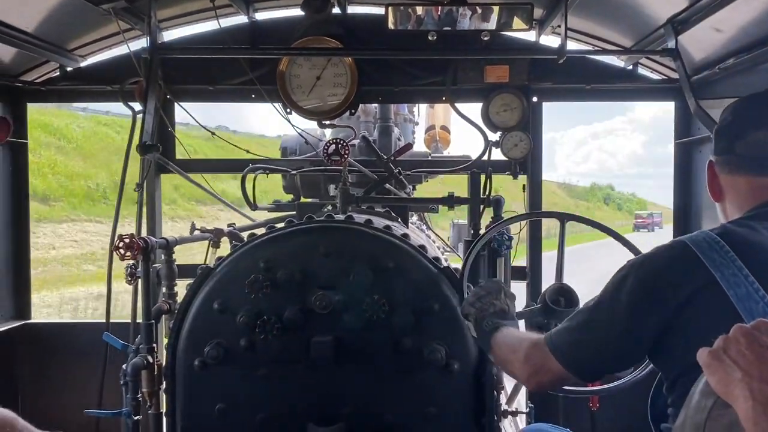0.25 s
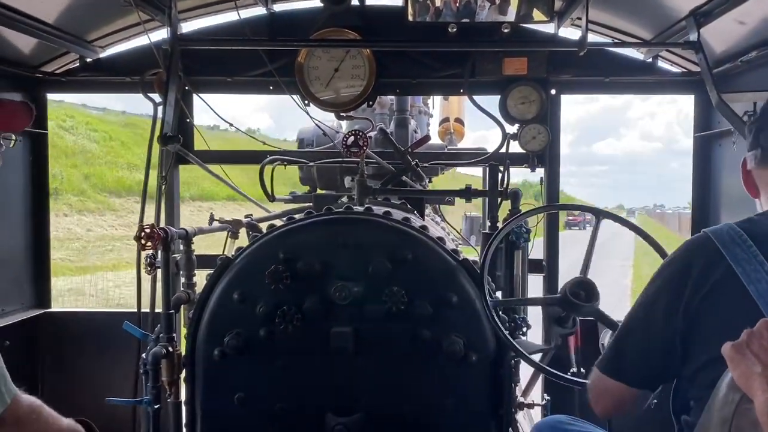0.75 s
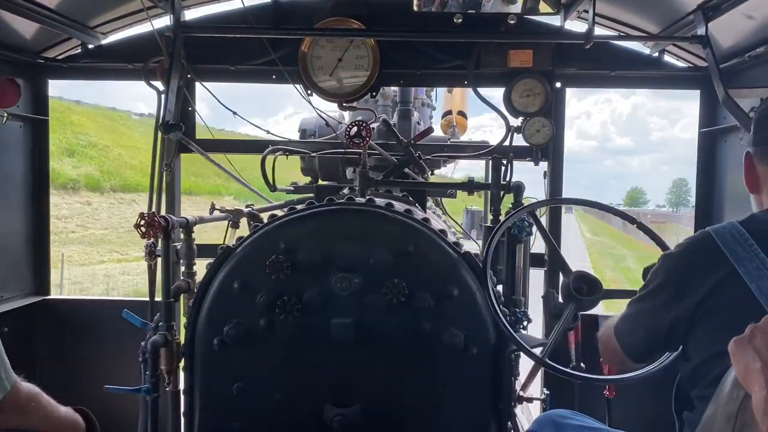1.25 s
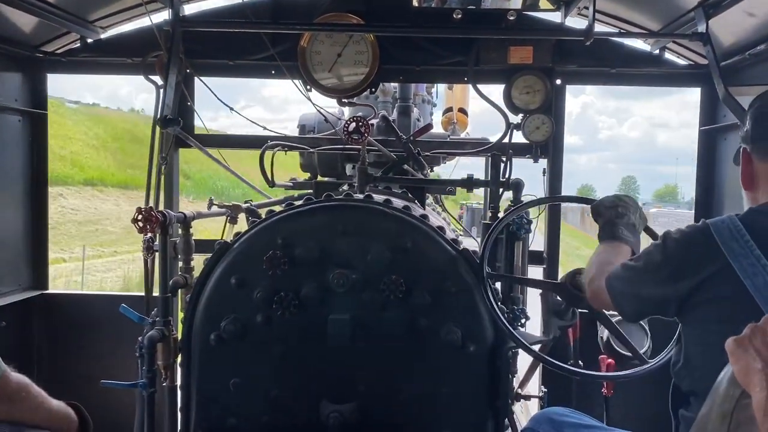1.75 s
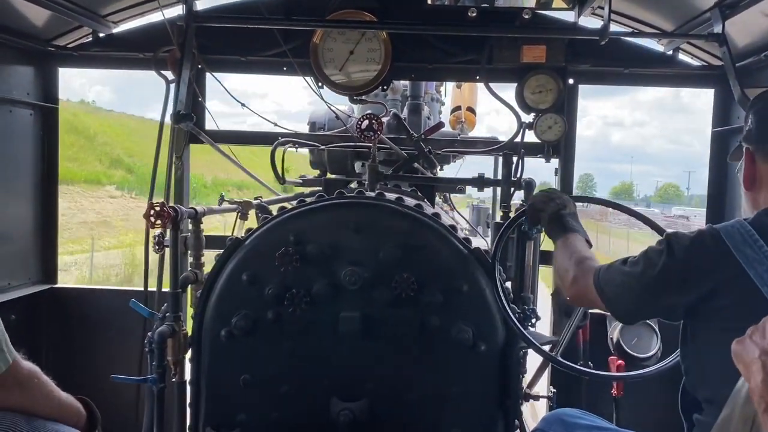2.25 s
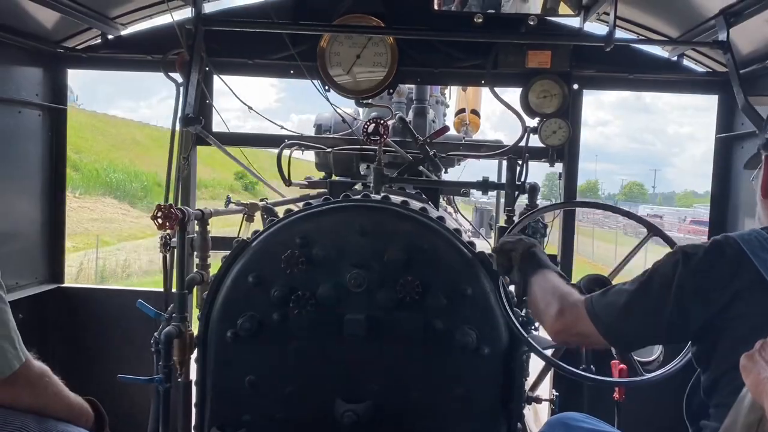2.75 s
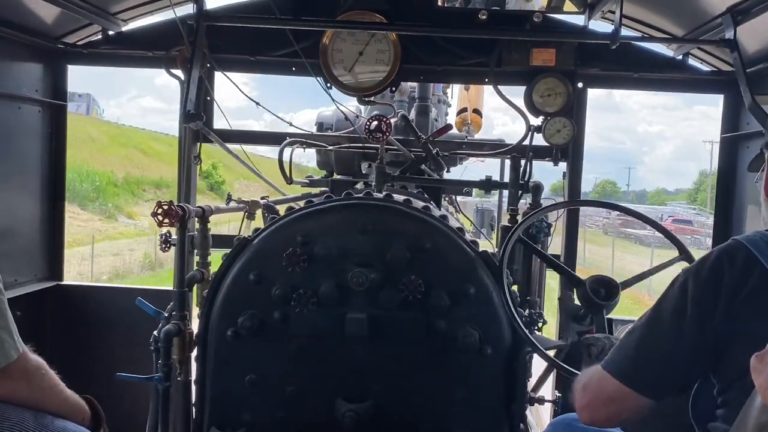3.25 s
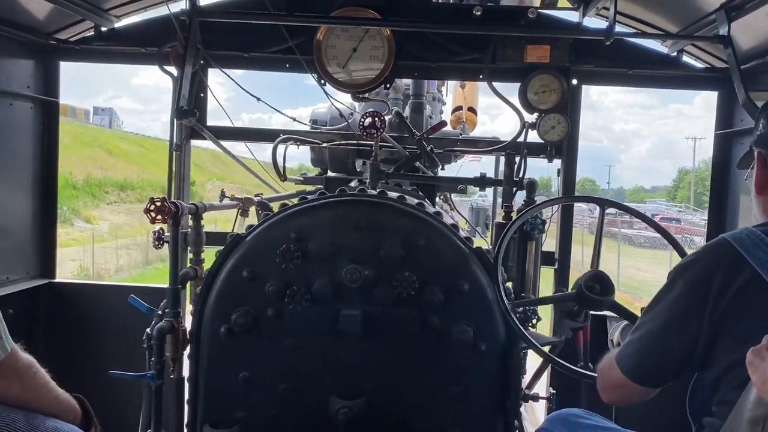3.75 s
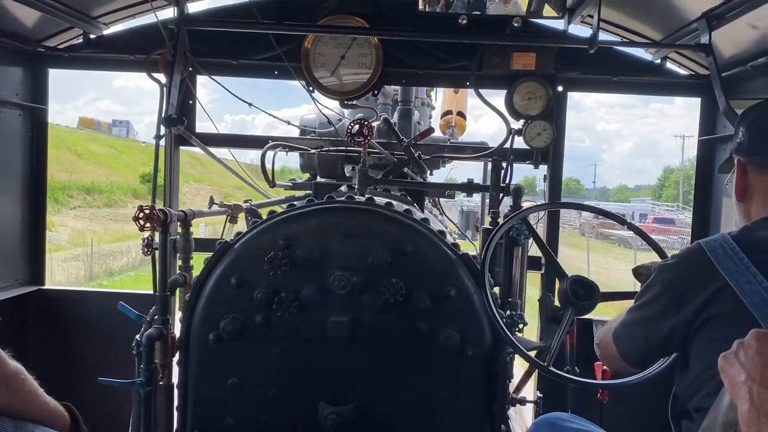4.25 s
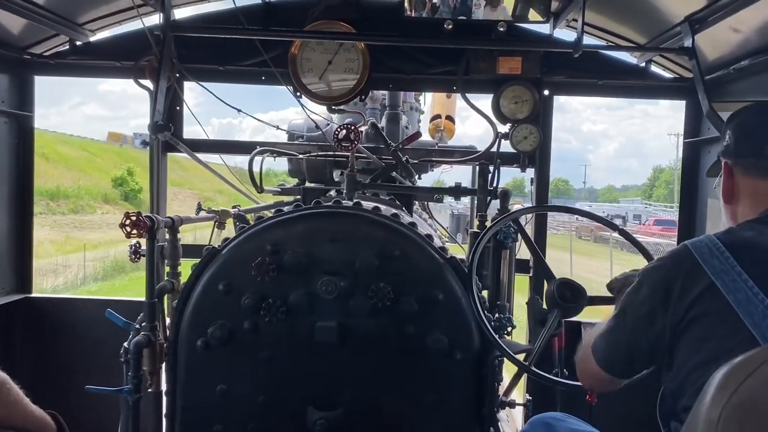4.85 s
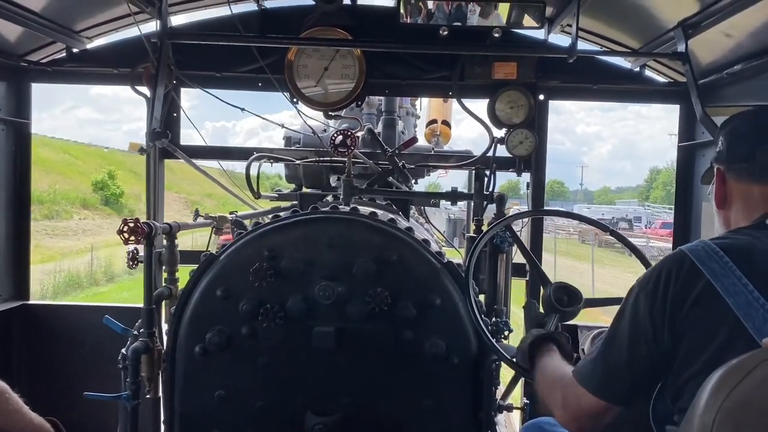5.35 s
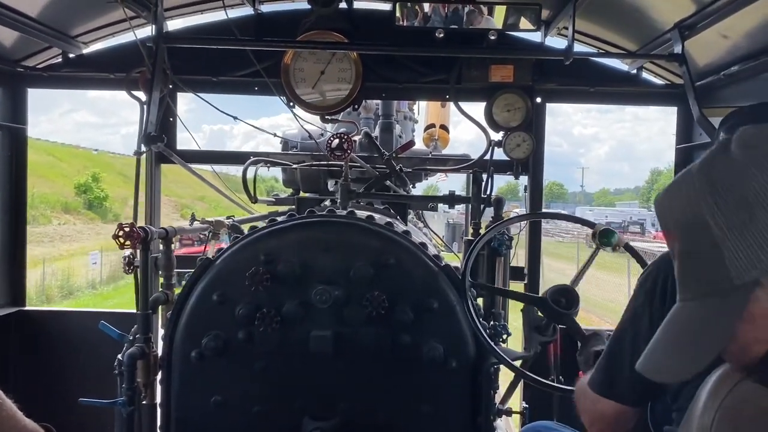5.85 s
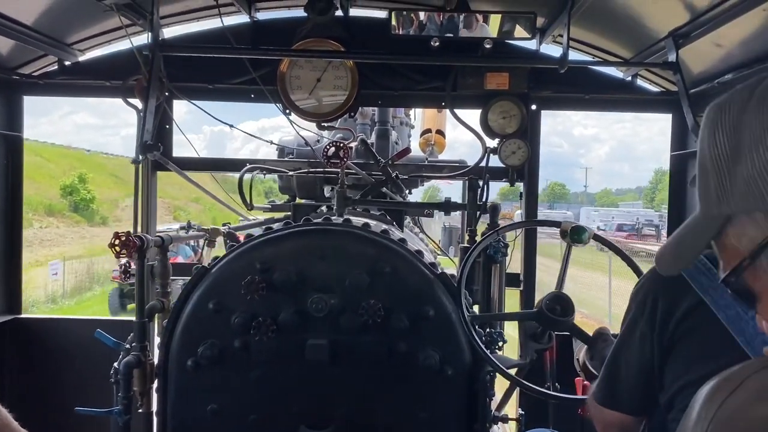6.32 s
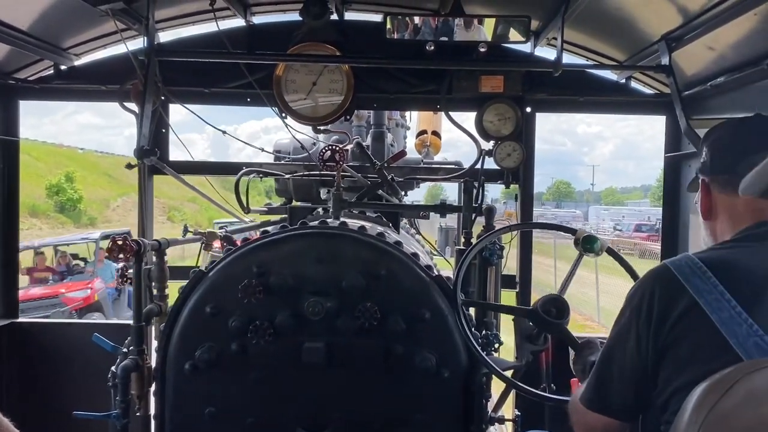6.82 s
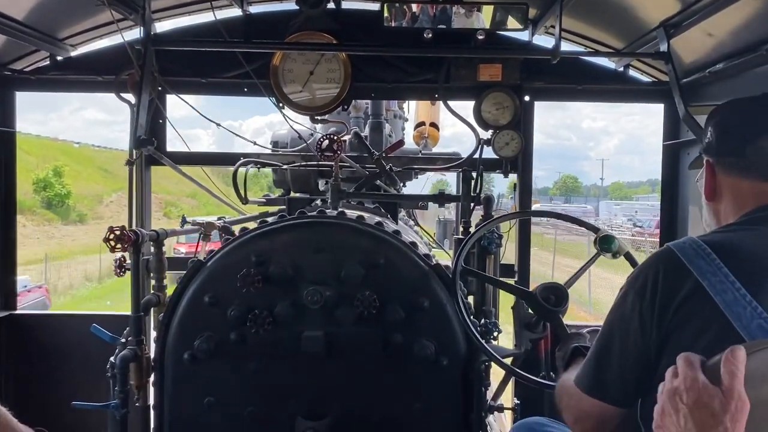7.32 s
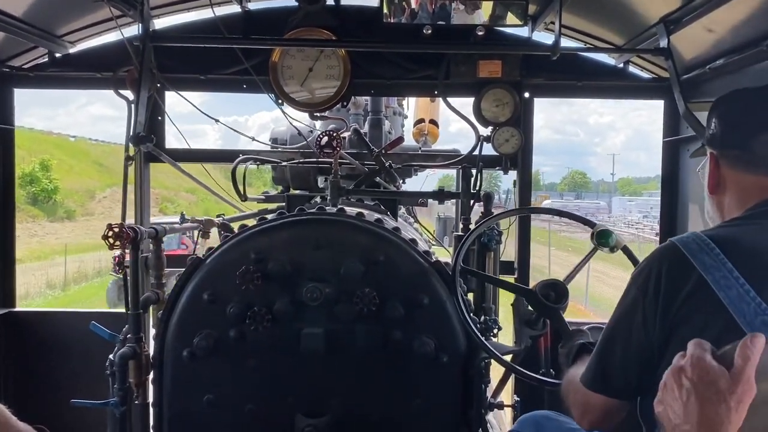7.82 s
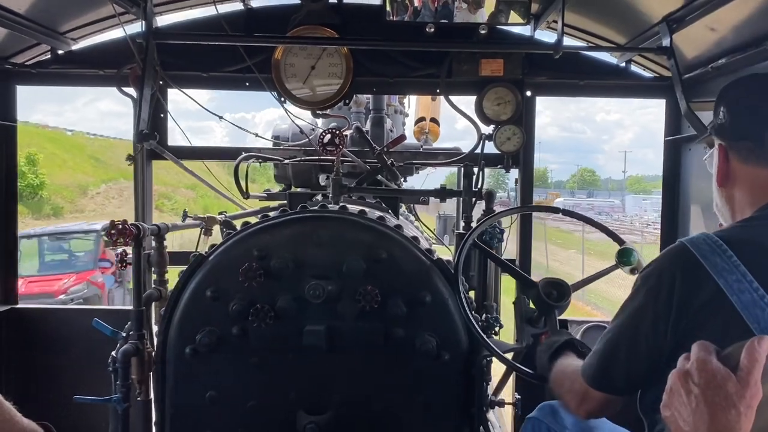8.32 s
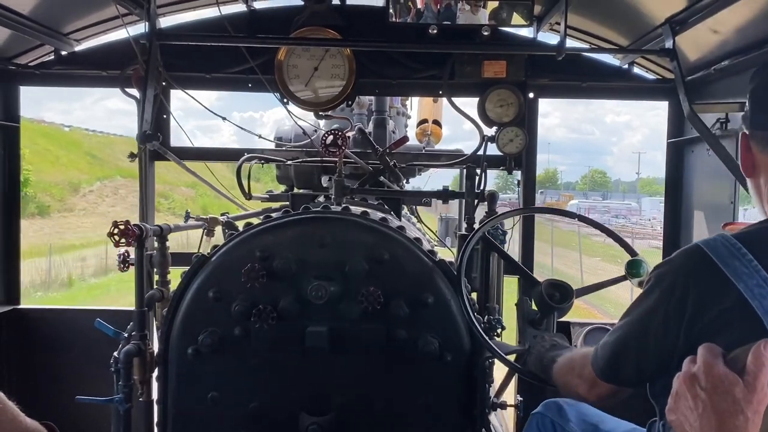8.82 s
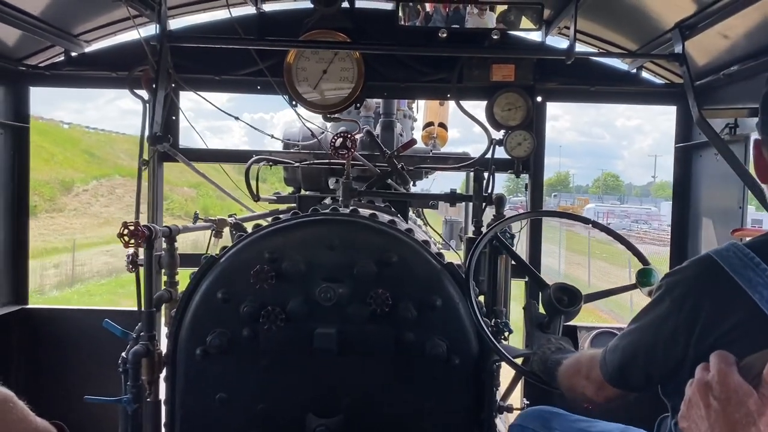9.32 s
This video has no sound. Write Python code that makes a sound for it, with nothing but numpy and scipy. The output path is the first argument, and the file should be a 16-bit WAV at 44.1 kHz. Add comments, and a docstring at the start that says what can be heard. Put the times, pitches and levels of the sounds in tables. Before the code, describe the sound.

A steam engine chugs briskly, hissing, barking puffs over low mechanical rumble and frame thumps, quickening slightly near the end.

```python
"""A two-cylinder steam traction engine rolls along a track, heard from inside its cab.
From the start, filtered noise makes gears and wheels rumble while a little steam leaks.
In each crank turn four exhaust puffs of shaped noise hiss, bark up the chimney and make the cab boom;
twice a turn a heavy knock, led by a softer bump, shakes the frame as a set of fading sine tones.
The crank times all of these, and towards the end it speeds up."""
import sys
import numpy as np
from scipy import signal
from scipy.fft import rfft, irfft, next_fast_len
from scipy.io import wavfile
from scipy.ndimage import uniform_filter1d, minimum_filter1d, map_coordinates

SR = 44100
rng = np.random.default_rng(int(sys.argv[2]) if len(sys.argv) > 2 else 0)


def wav_out(sig):
    """Save sig, one row per channel (or a flat mono array), as 16-bit PCM at SR to the path in sys.argv[1]."""
    wavfile.write(sys.argv[1], SR, np.round(np.clip(np.atleast_2d(sig).T, -1, 1) * 32767).astype(np.int16))


N = 422478  # length in samples

# How fast the crank turns. Each row: time in seconds, speed in crank turns per second.
CRANK_SPEED = [(0, 2.4401), (1.8, 2.4699), (5.6, 2.472), (7.3, 2.5501), (9.58, 2.7302)]
START_TURN = 0.02  # crank angle at the start, in turns
CRUISE_HZ, FAST_HZ = 2.48, 2.57  # crank turns per second at cruising pace and when running fast

# Tone of the gear and wheel rumble. Each row: frequency in Hz, relative level in dB per Hz.
RUMBLE_TONE = [(20, -25.5), (30, -24), (42, -5), (55, -1), (80, -4), (125, -7), (160, -12.5), (250, -8),
               (320, -13.5), (450, -16.5), (600, -23), (1000, -25), (2000, -31.5), (4000, -48.5)]
# Plates and panels that the running gear keeps ringing. Each row: frequency in Hz, width in Hz, lift in dB.
PANEL_RINGS = [(64.2, 4.5, 5.5), (121.4, 7.2, 3), (265, 5.9, 4), (739, 16, 4), (985, 57, 1.5),
               (1365, 28, 5.5)]
# Tone of the steam leaking from the glands. Each row: frequency in Hz, relative level in dB per Hz.
LEAK_TONE = [(1000, -11.5), (2500, 15), (5000, 8), (8000, -19), (16000, -31)]
# Once a turn a piston gland lets out a wisp of steam.
# The one row: crank angle in turns, length in seconds, lift over the steady leak in dB.
GLAND_WISP = (0.71, 0.019, 4.1)

# The drive takes up its slack twice a turn, each knock led by a softer bump.
# Each row: crank angle in turns, level in dB.
KNOCK_ANGLES = [(.578, -8), (.831, -8.5), (.475, -19), (.73, -17.5)]
# Ringing of the frame and cab floor. Each row: frequency in Hz, time to fade by 60 dB in seconds,
# level in dB at the first knock of a turn, level in dB at the second.
FRAME_RINGS = [(42, 0.1, -17, -6), (58.1, 0.29, -2.5, -12), (64.6, 0.47, -13, -1.5), (88.6, 0.1, -4.5, -9),
               (114, 0.14, -29, -9)]
# Slow change in the force of the knocks. Each row: time in seconds, change in dB.
KNOCK_FORCE = [(0, .8), (1.4, -1.5), (2.9, 2), (4, -1.5), (5.2, .7), (6, -1.4), (7.6, 1.3), (8.3, -3),
               (9, -1), (9.5, -3.5)]
KNOCK_SCATTER_DB = 0.8  # random spread from knock to knock

# The four exhaust beats of a turn, the cylinders taking turns; at speed their timing and strength
# shift a little. Each row: crank angle in turns, turns earlier at speed, dB louder at speed,
# then the starting levels of hiss, bark and boom in dB.
STROKE_BEATS = [(.008, .021, -0.9, -26.5, -27, -22.5), (.265, .019, 1.06, -26, -19.1, -16),
                (.493, 0, 0, -23.8, -21, -19), (.756, 0.0015, -1.06, -22.2, -17.5, -14)]
# No two beats are equally strong. The one row: random spread of hiss, bark and boom in dB.
BEAT_SCATTER = (.5, 0.43, 1.3)
# Slow swell of the hiss. Each row: time in seconds, dB for the two light beats of a turn,
# dB for the two heavy ones.
HISS_LEVEL = [(0, -.5, -0.5), (.65, -2, 1), (1.1, 0, -2.5), (1.9, -4, -1.5), (2.7, -0.7, -0.5),
              (3.1, -2, 0.4), (4.2, -0.3, 1.5), (4.75, 1, -1), (5.45, 1.5, 2), (5.95, -1.3, -1),
              (6.55, 1.5, .2), (7.1, 2.5, 0.7), (7.5, -1.5, 0), (8.5, 1.7, 0.5), (9.5, 1.8, 1)]
# Slow swell of the bark. Each row: time in seconds, change in dB.
BARK_LEVEL = [(0, 0), (2.3, 1.4), (3.1, -.2), (3.9, 0.6), (5.2, 1), (5.7, -1), (7.9, 0.2), (8.6, -1.3),
              (9.5, 0)]
# Slow swell of the boom. Each row: time in seconds, change in dB.
BOOM_LEVEL = [(0, 0), (.8, 2), (2.2, -1.5), (3.4, 2.5), (4.15, -3), (4.85, 2), (5.5, -2.5), (6.1, 1.8),
              (7.2, 1), (8.1, -.5), (9.5, 0)]
# The four valve openings of one turn. Each row: opening time in seconds,
# blow-down time in seconds before stretching, level of the steam still leaking in dB.
VALVE_OPENINGS = [(0.014, 0.041, -15.5), (0.013, 0.039, -25), (0.013, 0.043, -9), (0.01, 0.041, -15.5)]
SHORTEN = 0.7  # a puff's blow-down time falls with this power of the crank speed

# Tone of the blast-pipe hiss. Each row: frequency in Hz, relative dB for the first cylinder, for the second.
HISS_TONE = [(1200, -21, -21), (2500, -7.5, -3), (3600, -1, -0.5), (5640, 2, 1.5), (7750, -0.5, -2),
             (10800, 0, -4), (14000, -2.5, -8), (16000, -5, -12)]
# Tone of the chimney bark. Each row: frequency in Hz, relative dB for the first cylinder, for the second.
BARK_TONE = [(253, -18.5, -16), (376, 3.5, 6.5), (560, -1, -2), (1000, -4.5, -0.5), (1700, -5, -3.5),
             (2580, -8, -6.5), (3980, -15, -14.5), (7000, -38, -32)]
# The band in which each puff booms. Each row: frequency in Hz, relative level in dB per Hz.
BOOM_TONE = [(100, -35), (160, -8.5), (200, 2.5), (300, -1), (400, -4), (600, -30.5)]
# Chimney and cab resonances. Each row: frequency in Hz, width in Hz,
# lift in dB for the first cylinder, lift in dB for the second.
CHIMNEY_RINGS = [(434.6, 13.4, 9, 7), (500.6, 29, 10, 5), (665, 30, 6.5, 7), (740, 14.4, 10, 7.5),
                 (886, 50, 3, 3.5), (959, 39, 6, 6), (1017, 18, 11, 11), (1187, 60, 2, 4.5),
                 (1226, 31, 9, 7.5), (1272, 12, 5, 4), (1350, 26, 9.5, 9.5), (1464, 61, 9, 11.5),
                 (1596, 23, 5.5, 8.5), (1784, 12, 6.5, 2.5), (1993, 35, 5.5, 8.5), (2272, 71, 5, 5.5),
                 (2480, 25, 5, 8.5), (2774, 18, 9, 6.5), (3474, 350, 4.5, 5.5), (4234, 309, 3.5, 4.5),
                 (4626, 200, 4.5, 4.5)]
# Boom of the smokebox and cab. Each row: frequency in Hz, width in Hz,
# lift in dB for the first cylinder, lift in dB for the second.
BOX_RINGS = [(203.4, 9.2, 6, 2.5), (231.7, 18.3, 10.5, 9.5), (266, 17.2, 11, 14.5)]

# How alike left and right are. Each row: frequency in Hz, likeness (1 is the most alike).
LEFT_RIGHT_LIKENESS = [(60, 1), (130, 0.91), (290, 0.94), (600, 0.23), (1400, 0.072), (3000, 0.14),
                       (5500, 0.18), (8000, 1), (15000, 0.88)]
# Balance of the two channels. Each row: frequency in Hz, left minus right in dB.
LEFT_RIGHT_BALANCE = [(60, 0.5), (130, -0.6), (270, -1.2), (400, 0), (600, 1), (1000, 2.1), (2000, 0),
                      (4500, 2.2), (8000, 0)]
# Phase difference between the channels, which grows through the treble.
# Each row: frequency in Hz, radians by which left leads.
LEFT_RIGHT_PHASE = [(20, 0), (7200, 0), (9050, -np.pi), (11100, -2 * np.pi), (13150, -3 * np.pi),
                    (15200, -4 * np.pi), (16500, -14.5)]
TOP_HZ = 15900  # nothing is heard from here up


def amp(db):
    """Turn decibels into a gain."""
    return 10 ** (np.asarray(db) / 20)


def along(points, hz):
    """Read a curve of (Hz, value) points, with frequency on a log axis."""
    f, v = np.transpose(points)
    return np.interp(np.log(hz + 1), np.log(f), v)


def at_time(points, s):
    """Read a curve of (seconds, value) points."""
    return np.interp(s, *np.transpose(points))


def wobble(rate):
    """Draw a smooth random curve through `rate` random knots a second."""
    knots = rng.standard_normal(int(N * rate / SR) + 4)
    coarse = np.arange(0, N, 16)  # every 16th sample is smooth enough
    curve = map_coordinates(knots, [coarse * rate / SR])
    return np.interp(np.arange(N), coarse, curve)


def add(track, s, sound):
    """Mix a sound into a track at time s in seconds."""
    start = max(round(s * SR), 0)
    track[start:start + len(sound)] += sound[:max(N - start, 0)]


def causal(gain):
    """Make the impulse response with this gain that rings only after the blow (minimum phase)."""
    cepstrum = irfft(np.log(np.maximum(gain, 1e-6)))
    half = len(cepstrum) // 2
    # fold the second half onto the first, so that nothing sounds early
    cepstrum[1:half] *= 2
    cepstrum[half + 1:] = 0
    return irfft(np.exp(rfft(cepstrum)))


def turbulence(jet, spectrum, resonances, size=8192):
    """Colour two noises into stereo: the direct part rings in resonances, the scattered part is smooth."""
    hz = np.fft.rfftfreq(size, 1 / SR)
    lift = sum(db * np.exp(-((hz - centre) / width) ** 2) for centre, width, db in resonances)
    # this angle shares the sound between middle and sides
    turn = np.arccos(np.clip(along(LEFT_RIGHT_LIKENESS, hz), 0, .995)) / 2
    colour = amp(along(spectrum, hz))
    direct = causal(colour * np.cos(turn) * amp(lift))
    scattered = causal(colour * np.sin(turn))
    paths = np.array([direct, scattered])
    paths /= np.linalg.norm(paths)
    mid, side = signal.oaconvolve(jet, paths, axes=1)[:, :N]
    return np.array([mid + side, mid - side])


def speed_at(s):
    """Give the crank speed in turns per second at time s."""
    return at_time(CRANK_SPEED, s)


def hurry(s):
    """Tell how hard the engine is running: 0 at cruising pace, 1 when running fast."""
    return np.interp(speed_at(s), [CRUISE_HZ, FAST_HZ], [0, 1])


def crank_times(angle, advance=0):
    """Find when the crank passes an angle; at speed an event may come a little earlier."""
    t = np.arange(0, N, 32) / SR
    turned = np.cumsum(speed_at(t)) * t[1]  # adding up the speed gives the turns made
    turns = START_TURN + turned + advance * hurry(t)
    return np.interp(np.arange(angle, turns[-1], 1), turns, t)


def wisps():
    """Gain of the leak: it swells once a turn, as a piston gland lets out steam."""
    angle, length, lift_db = GLAND_WISP
    t = np.arange(N) / SR
    swell = sum(np.exp(-np.minimum(np.abs(t - s) / length, 10) ** 2) for s in crank_times(angle))
    return amp(lift_db * swell)


def steam_leak():
    """Steam escaping from the glands is a thin, slowly wavering noise."""
    level = amp(-41.0 + 1.4 * wobble(2.98))
    jet = wisps() * level * rng.standard_normal((2, N))
    return turbulence(jet, LEAK_TONE, [])


def running_gear():
    """Gears and wheels rumble unevenly and keep the plates and panels ringing."""
    level = amp(-17.5 + 0.35 * wobble(3.16) + 1.47 * wobble(22))
    return turbulence(level * rng.standard_normal((2, N)), RUMBLE_TONE, PANEL_RINGS)


def knocks():
    """Each knock sets the heavy frame swinging briefly; the two of a turn land differently."""
    out, t = np.zeros(N), np.arange(SR // 2) / SR
    onset = 1 - np.exp(-t / 0.0021)
    for knock, (angle, db) in enumerate(KNOCK_ANGLES):
        for s in crank_times(angle):
            blow_db = db + at_time(KNOCK_FORCE, s) + KNOCK_SCATTER_DB * rng.standard_normal()
            ring = np.zeros(len(t))
            for hz, t60, *levels in FRAME_RINGS:
                # each tone is also struck a little differently, with a spread of 1 dB
                tone_db = levels[knock % 2] + rng.standard_normal() - 60 * t / t60
                ring += amp(tone_db) * np.sin(2 * np.pi * hz * t)
            add(out, s, -amp(blow_db) * ring * onset)
    return out


def beats(stroke):
    """List one stroke's beat in every turn, as rows of (seconds, hiss dB, bark dB, boom dB)."""
    angle, advance, gain_db, *levels = STROKE_BEATS[stroke]
    s = crank_times(angle, advance)
    hiss_level = [(time, pair[stroke // 2]) for time, *pair in HISS_LEVEL]
    curves = (hiss_level, BARK_LEVEL, BOOM_LEVEL)
    swell = np.transpose([at_time(curve, s) + gain_db * hurry(s) for curve in curves])
    scatter = rng.standard_normal(swell.shape) * BEAT_SCATTER
    return np.column_stack([s, levels + swell + scatter])


def fitting_echoes(scatter):
    """Short random echoes among the engine's fittings give every puff a colour of its own."""
    size = 400
    echoes = rng.standard_normal(size) * np.exp(-np.arange(size) / SR / .003)
    echoes *= scatter / np.linalg.norm(echoes)
    echoes[0] = 1  # the direct sound
    return echoes / np.linalg.norm(echoes)


def puffs(cylinder, strokes, lead, stretch, shape, trail, scatter):
    """One cylinder's puffs: the valve opens, the pressure blows down, a little steam trails after.

    lead (s) starts a puff early, stretch and shape set its blow-down, trail (s) its tail."""
    jet, t = np.zeros((2, N)), np.arange(SR // 6) / SR
    for (opening, blow_down, trail_db), rows in zip(VALVE_OPENINGS[cylinder::2], strokes[cylinder::2]):
        valve = 1 - np.exp(-(t / opening) ** 2)
        tail = amp(trail_db) * np.exp(-t / trail)
        for s, db in rows:
            length = blow_down * stretch * (CRUISE_HZ / speed_at(s)) ** SHORTEN
            pressure = np.exp(-(t / length) ** shape) + tail
            for path in jet:
                steam = valve * pressure * rng.standard_normal(len(t))
                puff = signal.fftconvolve(steam, fitting_echoes(scatter))
                add(path, s - lead, amp(db) * puff)
    return jet


def for_cylinder(table, cylinder):
    """Pick one cylinder's column from a table whose last two columns are the two cylinders."""
    return [(*row[:-2], row[-2 + cylinder]) for row in table]


def exhaust():
    """Each puff hisses at the blast pipe, barks in the chimney and booms in the smokebox."""
    strokes = [beats(stroke) for stroke in range(len(STROKE_BEATS))]
    # each layer keeps the beat times and its own level column
    hisses, barks, booms = ([rows[:, [0, layer]] for rows in strokes] for layer in (1, 2, 3))
    out = np.zeros((2, N))
    for cylinder in range(2):
        chimney = for_cylinder(CHIMNEY_RINGS, cylinder)
        box = for_cylinder(BOX_RINGS, cylinder)
        nozzle = for_cylinder(HISS_TONE, cylinder)
        throat = for_cylinder(BARK_TONE, cylinder)
        sputter = amp(1.02 * wobble(350) + 0.85 * wobble(70))  # the wet jet tears unevenly
        hiss = sputter * puffs(cylinder, hisses, lead=.005, stretch=1.175, shape=1.97, trail=0.044, scatter=0.57)
        bark = sputter * puffs(cylinder, barks, lead=.004, stretch=1.28, shape=2.1, trail=0.032, scatter=0.52)
        boom = puffs(cylinder, booms, lead=.005, stretch=1.2, shape=2.24, trail=0.033, scatter=0.058)
        out += amp(3.0) * turbulence(hiss, nozzle, chimney)
        out += amp(2.5) * turbulence(bark, throat, chimney)
        out += amp(3.5) * turbulence(boom, BOOM_TONE, box)
    return out


def scene():
    """The whole engine, heard from the footplate."""
    return running_gear() + steam_leak() + knocks() + exhaust()


def record(dry, low_cut_hz=36):
    """Two channels with a low cut, a quick limiter on the loudest peaks and a band limit."""
    size = next_fast_len(N + SR // 2)
    hz = np.fft.rfftfreq(size, 1 / SR)
    # each channel takes half of the level difference and half of the phase difference
    phase = np.interp(hz, *np.transpose(LEFT_RIGHT_PHASE))
    left = amp(along(LEFT_RIGHT_BALANCE, hz) / 2) * np.exp(1j * phase / 2)
    low_cut = hz ** 4 / np.hypot(hz ** 4, low_cut_hz ** 4)
    channels = irfft(rfft(dry, size) * low_cut * np.array([left, 1 / left]), size)[:, :N]
    # the limiter turns both channels down together wherever a peak would pass .96
    needed = np.minimum(1, .96 / (np.abs(channels).max(axis=0) + 1e-9))
    gain = uniform_filter1d(minimum_filter1d(needed, size=101), size=101)
    return irfft(rfft(channels * gain, size) * (hz < TOP_HZ), size)[:, :N]


dry = scene()
out = record(dry)
wav_out(out)
```